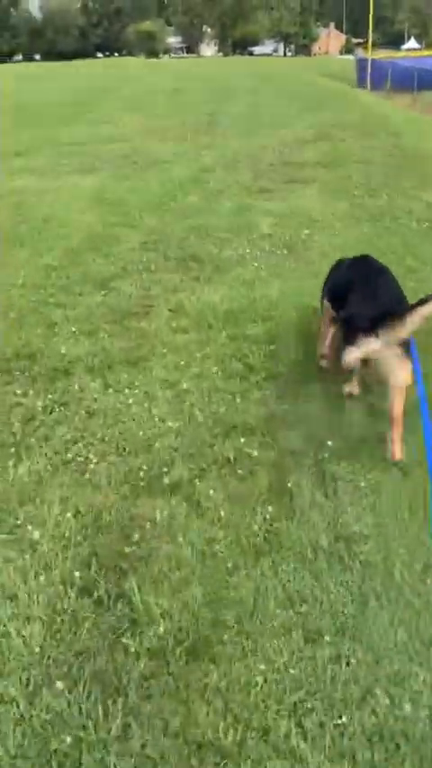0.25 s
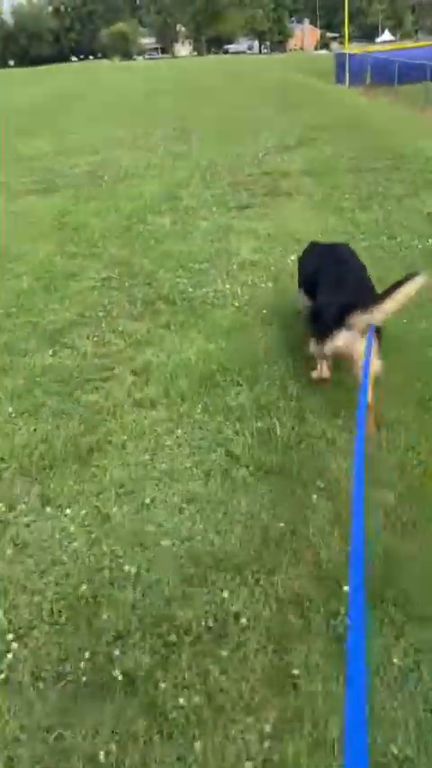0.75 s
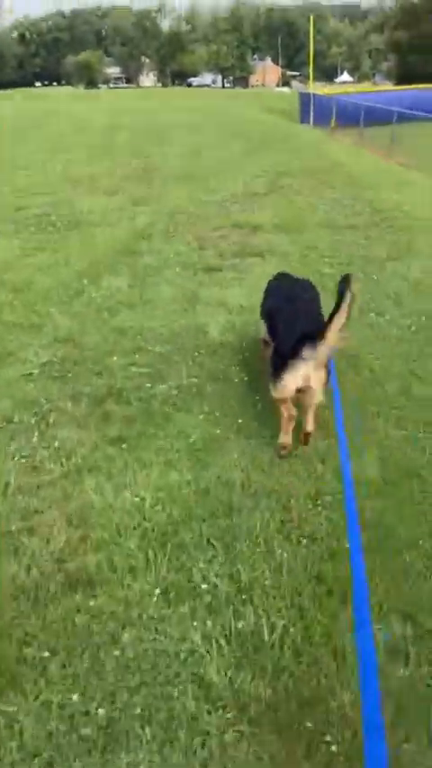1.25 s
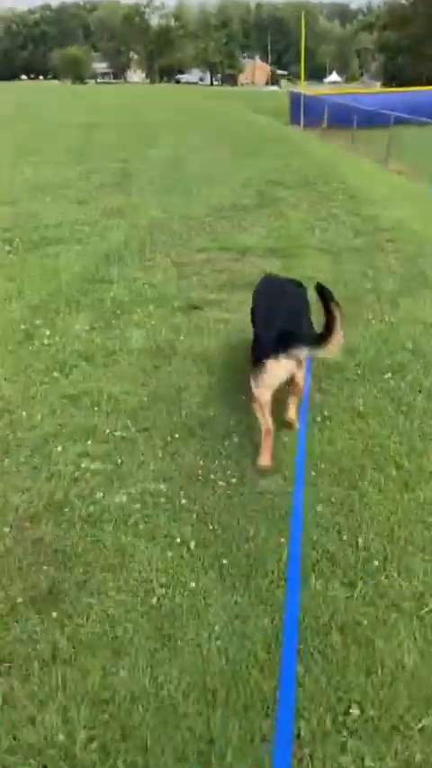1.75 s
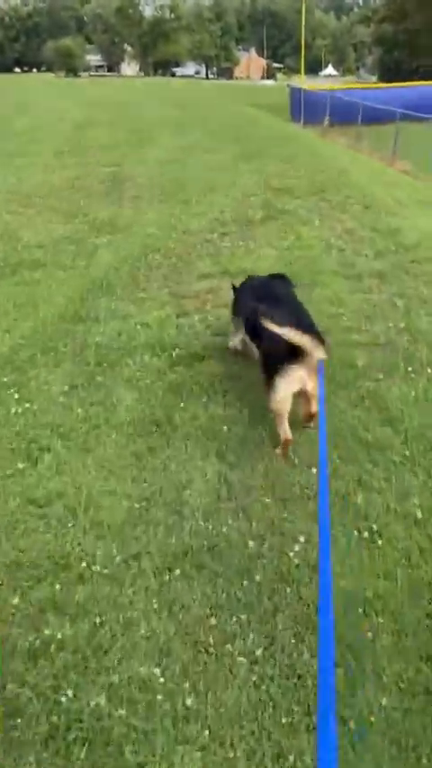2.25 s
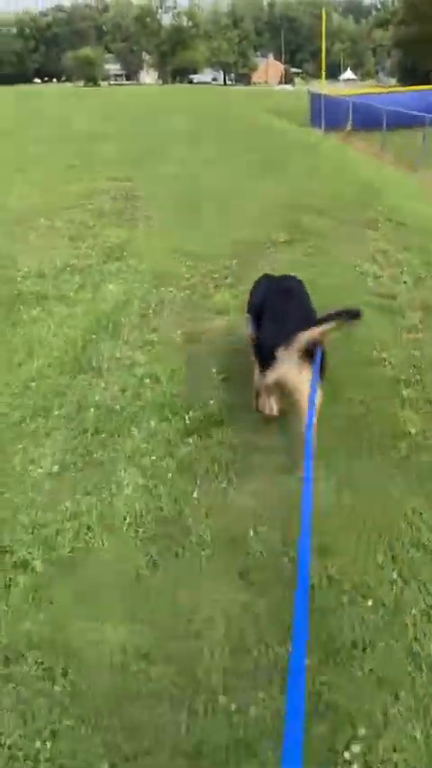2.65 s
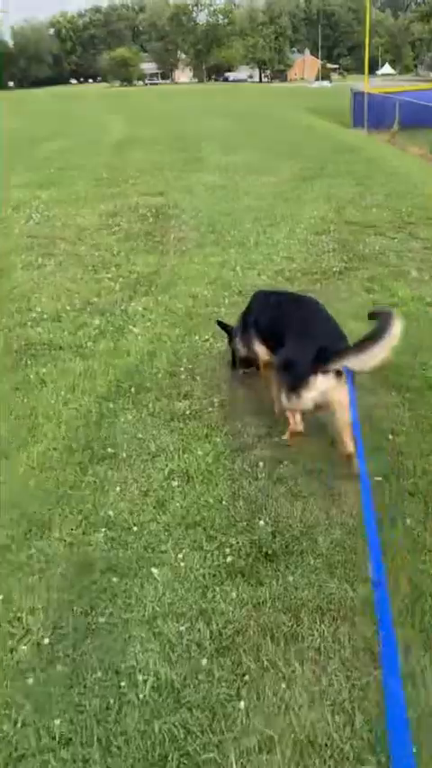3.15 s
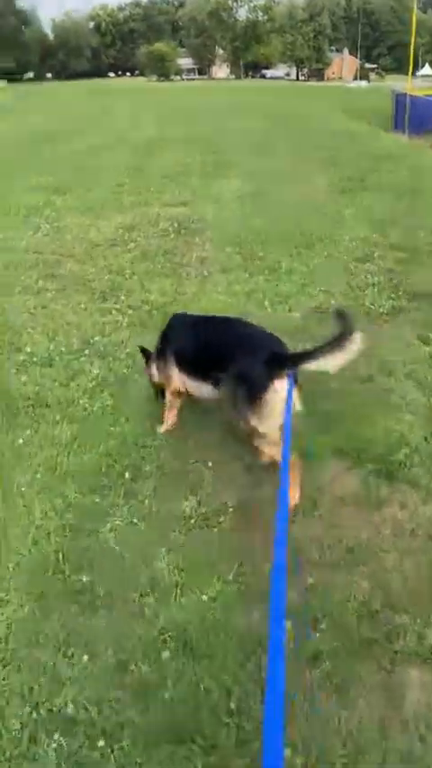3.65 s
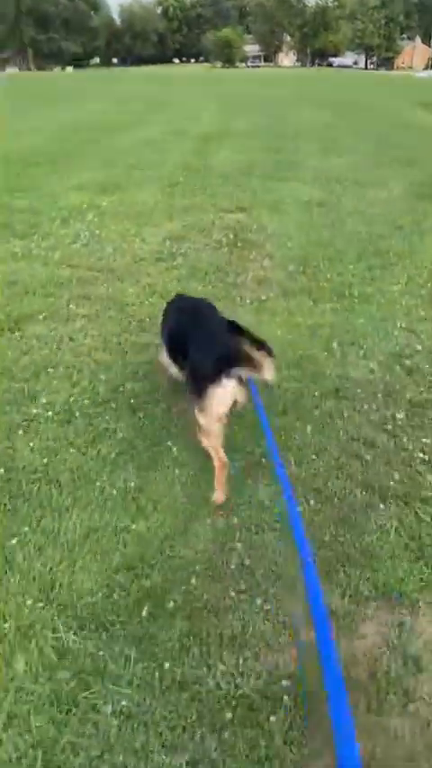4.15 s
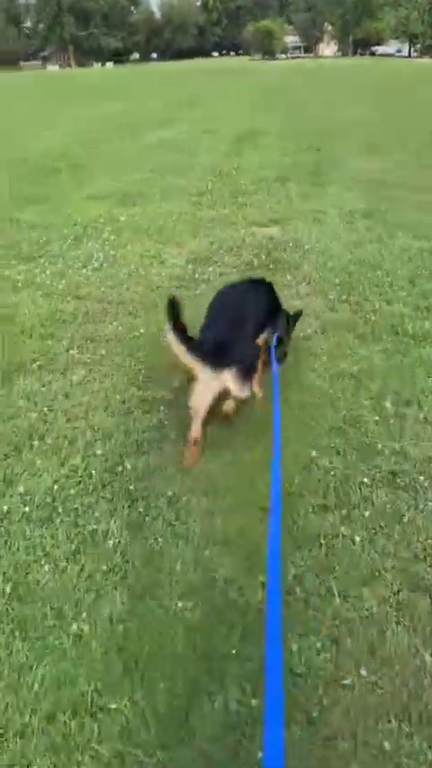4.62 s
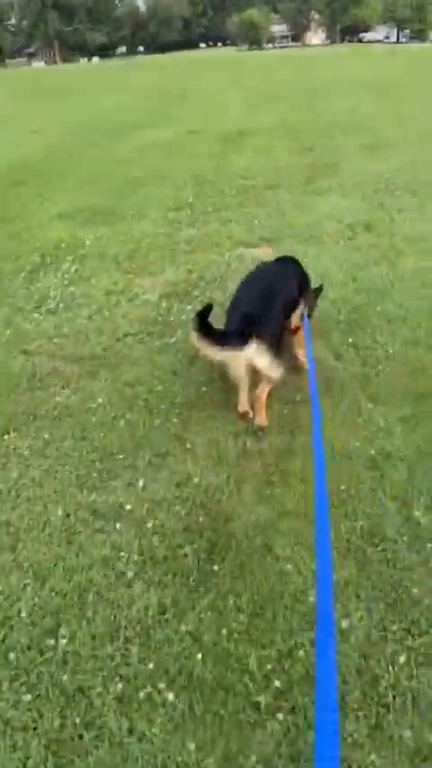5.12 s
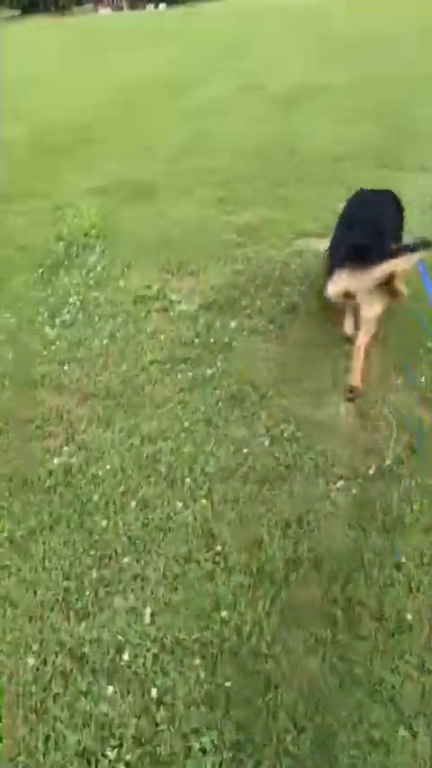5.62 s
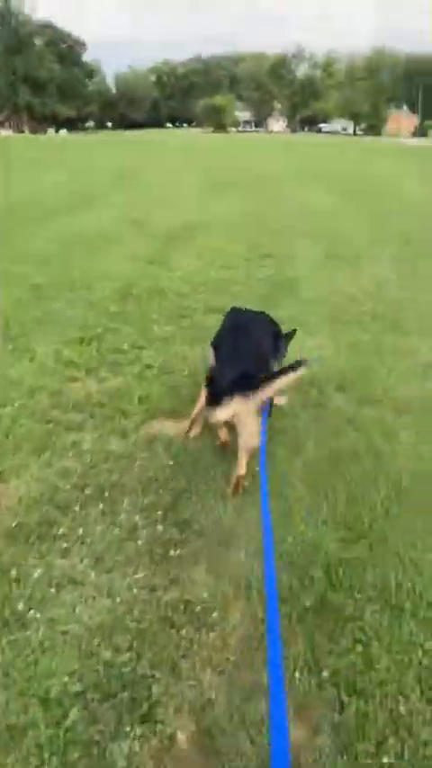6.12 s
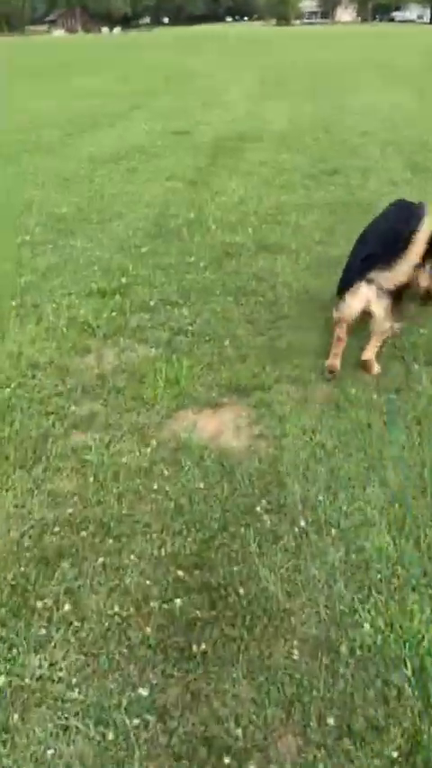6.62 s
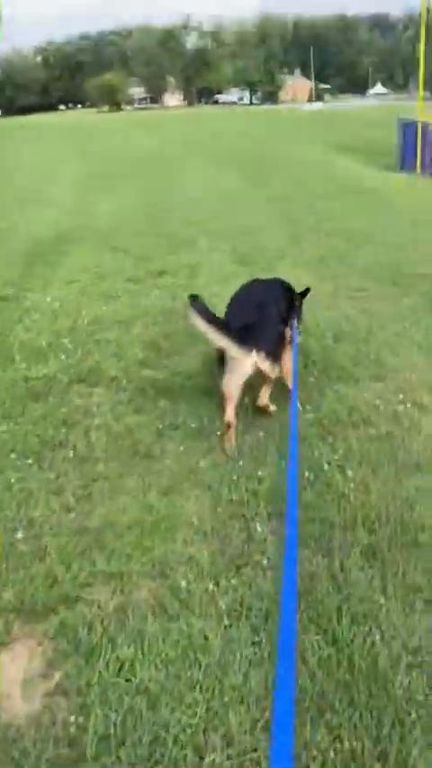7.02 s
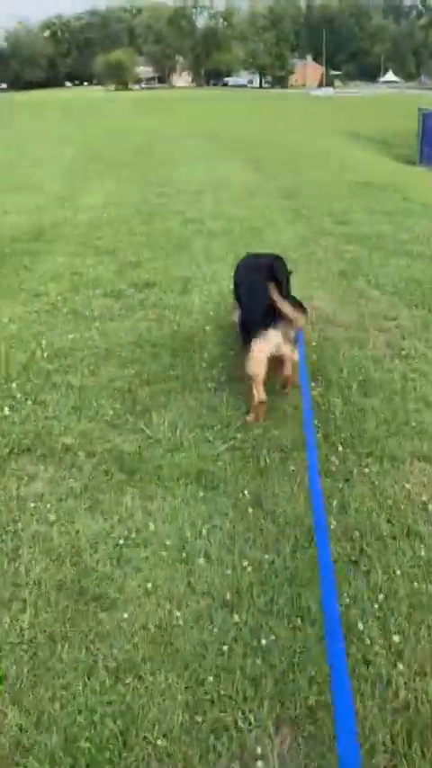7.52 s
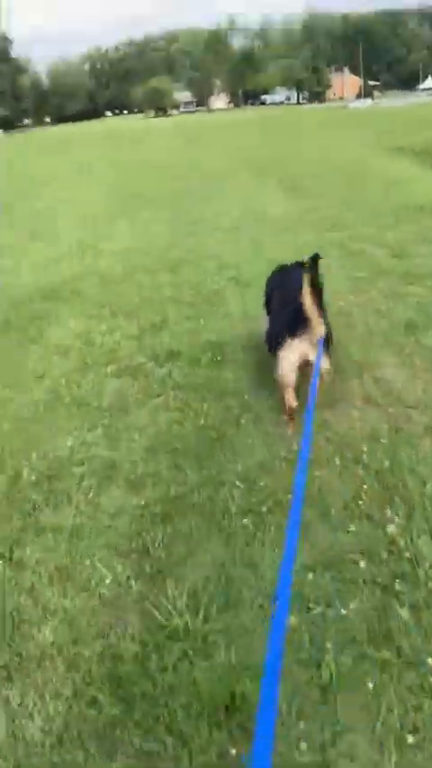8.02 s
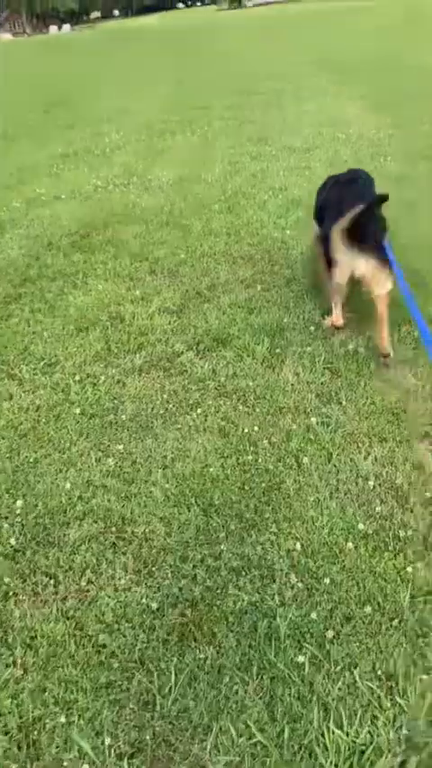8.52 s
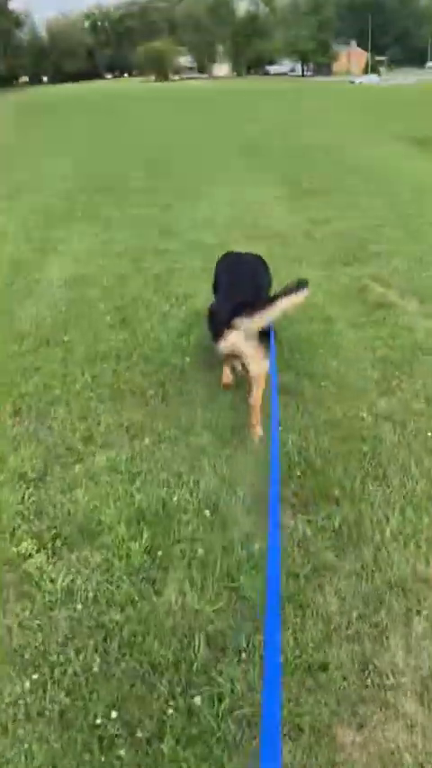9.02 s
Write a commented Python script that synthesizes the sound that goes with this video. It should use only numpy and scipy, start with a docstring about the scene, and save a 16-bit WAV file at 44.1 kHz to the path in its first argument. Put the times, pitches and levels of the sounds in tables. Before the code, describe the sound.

In an open grassy field, small metal leash clips jingle close to a handheld phone in stereo. A dense flurry of dry, bright clinks starts at once, with dull hand thuds and a wind puff around 0.1 s. Irregular knocks, short rattles and scraping slides continue, with tight clusters near 1.5, 1.9, 2.3 and 3.5 s; each ring dies almost instantly. Softer bumps come around 1.4-1.5 s. Low wind flutters beneath a faint hush. Around 4.5 s there is a tiny squeak, then thin insect buzzing at 4.7-5.0 s and very high small-ring pings near 5.5 s. Stronger clinks and a thud arrive at 6.1-6.3 s, another faint buzz at 6.5 s, and light grass brushes near 7.1 s. Crisp clatter returns around 7.0-7.2 s. The loudest clink hits at 8.7 s, followed by busy rattling, high pings and small bumps until about 9.3 s.

```python
"""A quiet mown field, where a dog is walked on a leash held in the same hand as the phone.
Tugs of the leash make its metal clips knock and rattle as damped modes; sliding contacts chatter and scrape.
A small ring tinkles among them in short, very high pings, and thin squeaks whistle now and then.
Filtered noise makes the air on the microphone ports, feet in grass, insect buzzes and the hush;
low decaying modes with a noise scuff make the hand bump the phone."""
import sys
import numpy as np
from scipy import signal
from scipy.fft import rfft, irfft, next_fast_len
from scipy.io import wavfile
from scipy.ndimage import uniform_filter1d

SR = 44100
rng = np.random.default_rng(int(sys.argv[2]) if len(sys.argv) > 2 else 0)


def transcribe(u):
    """Save the signal u as a 16-bit wav file named by the first command-line argument.

    u: samples, shape (n,) or (channels, n), limited to [-1, 1]; the rate is SR.
    q: integer samples, one column per channel.
    """
    v = np.clip(np.atleast_2d(u).T, -1, 1)
    q = np.round(v * 32767).astype(np.int16)
    wavfile.write(sys.argv[1], SR, q)


N = 408807
RING_SAMPLES = 4096  # length of one short sound
BLOW_SAMPLES = 200  # opening stretch over which a blow's level is set
TIME = np.arange(N) / SR
AGE = TIME[:RING_SAMPLES]

# Table values are starting points: the functions trim levels and scatter pitches, levels and decays.
# Colour curves give only the shape of a spectrum.

# Knocks of clip against clip: (time [s], ring level [dB], ring pitch [Hz], dry knock over ring [dB],
# upper modes over ring [dB], left minus right [dB])
CLINKS = [(.017, -40, 4060, -14, -10, -10), (0.054, -32, 3510, -16, -9, -7),
          (.068, -34, 3700, -13, -3, -3.5), (0.1042, -31, 4300, -4, -16, -5),
          (.119, -31.5, 4320, -8, -5, -1.5), (.127, -32, 4540, -13, -4, -2), (.136, -29, 4690, -23, 0, -1),
          (.147, -34, 4070, -18, -2, -1.5), (0.1975, -32.5, 4180, -11.5, -1, -9),
          (.258, -44.5, 3980, -15, -8, -13), (.3657, -32, 4080, -16, 0, -2), (.58, -37, 3990, -16, -6, 1),
          (0.5903, -30.5, 3860, -7, 3, 0), (.6315, -37, 4240, -10, 13, 0.5),
          (.677, -33.5, 4220, -11, 12, 1), (0.6982, -31, 3850, -12, 8, -1), (.754, -39, 4020, -7, -9, -9),
          (0.7946, -30, 4100, -8, -6, -6), (.8397, -37, 3940, -12, 1, -5),
          (.973, -47.5, 4050, -3, -10, -10), (1.0164, -27, 3930, -7, -13, -3.5),
          (1.03, -42, 3900, -14, -10, -3), (1.042, -38, 3980, -11, -9, -4), (1.098, -43, 3930, -10, -7, -4),
          (1.106, -48, 4010, -17, -4, -7), (1.1723, -32, 4070, -7, -5, -1),
          (1.341, -40.5, 4110, -21, -7, -0.5), (1.396, -46, 3980, -13, -10, 0),
          (1.438, -44, 4020, -1.5, 6, 0.5), (1.4748, -28, 3990, -20, -2, 15),
          (1.496, -35, 4000, -12, -5, -1), (1.5015, -28.5, 3960, -16, -13, 1),
          (1.5055, -26.5, 3880, -12, 3.5, 0), (1.537, -37.5, 3800, -0.5, -15, 12),
          (1.573, -37, 3900, -10, -12, -1), (1.595, -41, 4030, -15, -8, 0), (1.6585, -41, 3830, -3, 8, -1),
          (1.697, -32, 3900, -12, 10, -1), (1.786, -42, 3820, -7, 16, -2), (1.883, -34, 3800, -2, 6, -2),
          (1.906, -28.5, 3460, -8, -2, -1.5), (1.9193, -30.5, 3420, -13, 12.5, 0),
          (1.93, -31, 3900, -7, -7, -3), (1.967, -43, 4100, -4, -1, 5), (2.064, -36.5, 3980, -18, -8, -3.5),
          (2.114, -39, 4090, -18, -3, -6), (2.1336, -33.5, 4210, -14, 12, -1),
          (2.239, -41, 4160, -10, -5, 0), (2.247, -37.5, 3980, -16, -14, 2), (2.277, -29, 3880, -9, -10, 6),
          (2.2817, -22, 3910, -6, -27, 0.5), (2.292, -23, 4100, -13, -21, 14),
          (2.2965, -25, 3960, -12, -10, 1), (2.3049, -26, 3870, -11, -22, 0.5),
          (2.315, -37, 4050, -6, -6, 2), (2.354, -19, 3920, -17, -24, 1), (2.402, -40, 3860, -22, 4, 0),
          (2.425, -48, 3920, -15, 16, 0), (2.512, -40, 3930, -14, 14, 0),
          (2.5281, -25.5, 3900, -15, 6.5, -0.5), (2.575, -38.5, 3980, -4, 11, 0),
          (2.593, -37, 3980, -17, 5, -2), (2.7054, -37, 4090, -22, -6, -13),
          (2.72, -41, 4000, -20, -10, -10), (2.932, -31.5, 4080, -6.5, -20, 5),
          (2.963, -33.5, 4210, -18, -9, 0), (2.991, -44, 4100, -16, -5, -5),
          (3.003, -40, 4060, -18, -8, -12), (3.053, -40, 3970, -17, 0, -1),
          (3.173, -44, 4080, -19, -12, -12), (3.193, -33, 3960, -27, 0, -1),
          (3.224, -45, 4060, -18, -4, -9), (3.244, -45, 4040, -18, -9, -8),
          (3.3572, -35.5, 3870, -20, -15, 0.5), (3.393, -41, 4050, -11, 0, 2),
          (3.413, -30.5, 3940, -16, -8, 1.5), (3.432, -38, 3970, -7, -8, 0.5),
          (3.4656, -32, 4090, -10, 1, 0), (3.473, -31, 3990, -25, -13, -2),
          (3.49, -27.5, 4010, 0.5, 2, -0.5), (3.497, -25, 3920, -6, 8.5, 1),
          (3.7049, -39.5, 4120, -5.5, -16, -4.5), (3.78, -30, 4140, -15, 8.5, 3.5),
          (3.802, -36.5, 4150, -11, 13, -4), (3.8247, -29.5, 3950, -10.5, 1, -2.5),
          (3.831, -34.5, 4000, -8, 14.5, 8), (3.842, -32, 3950, -20, -8, -3.5),
          (3.887, -39, 3940, -16, -9, -6), (3.92, -41, 3930, -9, -12, -6), (4.055, -40, 4100, -14, 8, -12),
          (4.2227, -35.5, 3970, -0.5, -18, 0), (4.246, -29, 4000, -7, 6, 1),
          (4.308, -40, 3940, -20, -1, -0.5), (4.406, -41, 4130, -13, -2, 0), (4.419, -38, 4100, -17, 8, 0),
          (4.44, -36, 3910, -13, -1, -1), (4.5006, -29, 3990, -38, -1, -9),
          (4.7705, -37, 3800, -14, -3, -2), (4.783, -46, 4040, -18, -9, 4), (4.821, -40, 3950, -18, -8, 8),
          (4.9015, -40, 3970, -11, -5, -8), (4.954, -41, 3900, -12, 7, -14),
          (5.192, -35.5, 3890, -3.5, -11, -2), (5.2002, -34.5, 3920, -7, -22, -3),
          (5.21, -39, 3920, -10, -6, 0), (5.217, -40, 3960, -10, -1, 0), (5.2646, -34, 3930, -5, -5, 1),
          (5.29, -34.5, 4080, -4.5, 4, 0), (5.333, -40, 3840, 1, 2, -4), (5.3528, -34.5, 3970, -3, 8, -1),
          (5.36, -38, 3980, -15, 0, -8), (5.374, -37, 3970, -17, -9, -8),
          (5.4022, -38.5, 3800, -0.5, -5, -6), (5.494, -42, 3980, -17, -7, -6),
          (5.571, -46, 3940, -15, -7, -4), (5.587, -41, 3970, -16, -9, -2.5),
          (5.599, -46, 3980, -13, -2, 4), (5.631, -40, 3840, -10, 15.5, 9),
          (5.686, -37.5, 3850, -27, -24, 13), (5.758, -42, 3880, -18, -6, 1.5),
          (5.774, -42, 3970, -5, 0, 3), (5.8306, -38, 4130, -7, 7, -6), (5.843, -41, 4010, -16, -9, -7),
          (5.871, -36.5, 4040, -6, -13, -12), (5.892, -29.5, 4040, -4.5, -19, -9),
          (5.905, -36, 3880, -18, -13, -6), (5.933, -27, 4030, -16.5, -5, -16),
          (5.957, -44, 3960, -16, -13, -12), (6.011, -34, 4050, -15, 5, -0.5),
          (6.052, -40, 4100, -12, 3, -1), (6.0845, -24, 4150, -14, 2, 11), (6.09, -21, 3870, -32, 2, -1),
          (6.146, -34, 3930, -30, 5, 0.5), (6.2592, -26.5, 3910, -19, -19, 1),
          (6.2713, -33.5, 3880, -5, 9, 15), (6.284, -30, 3950, -14, 11, -0.5),
          (6.3134, -29.5, 4250, -9.5, 7, -13), (6.378, -38, 3950, -14, -18, -5),
          (6.509, -35, 3860, -14, -1, -3.5), (6.525, -35, 3510, -22, -17, -1),
          (6.5593, -32, 3370, -30, -19, -1), (6.5864, -34.5, 3680, -9, -16, -1.5),
          (6.617, -37, 4030, -13, -8, 3), (6.682, -36.5, 3760, -5, 4, -2.5),
          (6.708, -39.5, 3870, 1, -9, -9), (6.724, -40, 4000, 0, -2, -7), (6.75, -37, 3970, -14, -3, -15),
          (6.772, -33, 4120, -17, 8, -9), (6.79, -33, 4080, -16, -7, -6), (6.994, -32, 3980, -17, -3, -1),
          (7.016, -32, 3880, -15, -13, 2), (7.0232, -21, 3930, -28, 3.5, -1),
          (7.042, -35, 3920, -15, -8, -0.5), (7.104, -41, 3430, -9, -10, 1),
          (7.1968, -27, 3960, -0.5, -7, 2), (7.2052, -28, 3620, -20, -6, -0.5),
          (7.213, -25.5, 3680, -15, -6, -1.5), (7.2233, -29.5, 4030, 0, -7, -1.5),
          (7.286, -41, 4000, -17, -12, -10), (7.295, -38, 4030, -3.5, -4, -0.5),
          (7.463, -39, 4010, -13, -7, -1.5), (7.476, -42, 3970, -14, -6, -2.5),
          (7.494, -38, 3920, -9, -8, -3), (7.5444, -30, 3940, -26, -2, -3.5),
          (7.563, -43, 3930, -18, -9, -3), (7.595, -41.5, 3950, -6, 10, -4),
          (7.697, -33.5, 4070, -20, -4, -7), (7.798, -31.5, 3630, -10.5, 2.5, -1.5),
          (7.8693, -41, 3960, -16, -7, 6), (7.904, -35, 3940, -22, -4, 0),
          (7.9148, -27.5, 4000, -6, 6.5, 12), (7.976, -45.5, 3950, 1, 19, 4),
          (8.0558, -28, 3660, -22, 5.5, -7), (8.0847, -32.5, 3970, -11, 8, -10),
          (8.1735, -41, 4020, -7, 2, 4), (8.198, -45, 3940, -14, -12, -6), (8.247, -42, 3980, -15, -9, 3.5),
          (8.2804, -42, 3950, 1.5, 6, -6), (8.3204, -39.5, 3400, -2, 8, 3), (8.363, -46, 4050, -15, -1, -4),
          (8.386, -40.5, 3550, -7, -4, -3.5), (8.4465, -29, 3690, -10.5, -27, 2.5),
          (8.565, -26.5, 3970, -24, 0, -8), (8.599, -42, 4000, -14, -8, -16),
          (8.6968, -25, 4000, -15, 3.5, -0.5), (8.7258, -14.3, 3960, -20.5, -1.5, -1.5),
          (8.7318, -22.5, 4260, -23, -9, 2.5), (8.7471, -20, 3930, -18.5, 1, -2),
          (8.7562, -27, 3920, -19, 6.5, 0), (8.795, -36, 3930, -13.5, -5, -4.5),
          (8.869, -40, 3960, -8, -1, -10), (8.925, -28.5, 4100, -9, -12, -13),
          (8.93, -24, 3910, -15, 7, -11), (8.9441, -27, 4150, -15, 2, -23),
          (9.0168, -29.5, 3670, -12, 6.5, -2), (9.069, -44, 3930, -13, -14, -4),
          (9.114, -43.5, 3940, -14, -6, -4), (9.172, -43, 3960, -17, -14, -4),
          (9.181, -42, 3960, -19, -7, -4), (9.214, -24.5, 3800, -15, 7, -6),
          (9.226, -28.5, 3840, -11, 1, -4), (9.246, -36, 3960, -8, 12, -12),
          (9.256, -30, 3940, -12, -4, -3.5)]
# Main ring of the clips: (multiple of ring pitch [ratio], level [dB], t60 [s])
MAIN_MODES = [(.88, -8, 0.023), (0.952, -11, 0.028), (0.997, 0, 0.047), (1.007, -3, 0.037),
              (1.055, -9, 0.022), (1.16, -9, 0.0099)]
# Upper modes of the clips: (pitch [Hz], level [dB], t60 [s])
UPPER_MODES = [(5390, 0, 0.018), (6008, 9.5, 0.021), (6600, -2.5, 0.045), (7340, 1, 0.027),
               (7620, 5.5, 0.025), (8730, -11, .012), (9450, -2.5, 0.015), (9900, -17, .012),
               (10500, -14, 0.032), (10700, -10, .019), (11900, -14, .008), (13500, -3, .018),
               (14200, -9, .012), (15410, -20, .025)]
# Colour of the dry knock: (frequency [Hz], level [dB])
KNOCK_COLOUR = [(700, -74), (1400, -7.5), (2200, 1.5), (3200, 7), (4600, 1), (6500, -6.5), (8200, -2),
                (10000, -10), (15000, -25)]
# Loose rattles: (start [s], end [s], start pitch [Hz], end pitch [Hz], level of each knock [dB])
RATTLES = [(0.584, 0.716, 3830, 3900, -51), (1.479, 1.59, 3900, 4100, -43.5),
           (1.897, 1.953, 3560, 3390, -34.5), (4.773, 4.831, 3430, 3710, -47),
           (5.27, 5.369, 3940, 3780, -42), (6.512, 6.627, 3410, 3540, -45), (6.68, 6.779, 3300, 2910, -48),
           (8.728, 8.801, 3920, 3950, -41), (8.9, 9.042, 4040, 3680, -45)]
# Tugs that slide the clips over each other: (start [s], length [s], chatter of the main ring [dB],
# dry scrape [dB], fine jingle [dB])
TUGS = [(0.07, 0.12, -41, -54, -55.5), (0.58, .11, -44.5, -51, -54.5), (1.013, 0.059, -53, -54, -57.5),
        (1.17, 0.078, -52, -68, -53.5), (1.474, 0.079, -37.5, -47.5, -55.5),
        (1.648, 0.058, -57, -50, -52.5), (1.895, 0.059, -41, -48, -48), (2.093, 0.044, -51, -53, -51.5),
        (2.289, 0.042, -35.5, -47, -62), (2.376, 0.052, -47, -74, -55), (2.529, 0.047, -37, -39.5, -46.5),
        (2.689, 0.027, -48, -49, -55.5), (2.893, 0.062, -41.5, -65, -52.5), (3.034, 0.073, -45.5, -56, -72),
        (3.406, 0.051, -42, -46, -60), (3.461, 0.085, -43, -50, -51.5), (3.818, 0.11, -46.5, -54.5, -59.5),
        (3.96, 0.11, -52, -73, -56.5), (4.238, 0.049, -40, -46.5, -48), (4.303, 0.092, -53, -72, -53),
        (4.415, 0.035, -40.5, -43.5, -46.5), (4.775, 0.04, -60, -71, -57), (4.906, 0.098, -50, -71, -57),
        (5.061, 0.014, -49, -55, -51), (5.182, 0.027, -43, -55, -55), (5.27, 0.086, -40.5, -50, -56),
        (5.402, 0.2, -59, -72, -54), (5.613, 0.22, -50, -60, -56.5), (6.049, 0.065, -39, -47, -48.5),
        (6.15, 0.029, -37, -66, -54), (6.235, 0.1, -37, -44.5, -49), (6.383, 0.12, -53, -49.5, -65),
        (6.508, 0.16, -46.5, -55, -56.5), (6.674, 0.14, -56, -59, -52), (6.972, 0.033, -36, -45.5, -46),
        (7.202, 0.024, -35, -35, -36.5), (7.372, 0.15, -66, -50.5, -78), (7.477, 0.14, -46, -57, -58),
        (7.868, 0.053, -37, -45, -58), (7.978, 0.042, -57, -49, -52), (8.044, 0.098, -52, -54.5, -57.5),
        (8.263, 0.091, -47.5, -54, -52), (8.552, 0.041, -62, -52.5, -54), (8.69, 0.098, -41.5, -54, -51.5),
        (8.85, 0.026, -52, -54, -53), (8.89, 0.11, -42, -46.5, -44.5), (9.17, .04, -70, -56, -53.5),
        (9.222, 0.048, -47, -61, -50)]
# The clips never quite rest: (chatter [dB], scrape [dB], jingle [dB])
SWAY_DB = (-64, -58, -65.5)
# Colour of the dry scrape: (frequency [Hz], level [dB])
SCRAPE_COLOUR = [(400, -36), (900, -3), (1500, 0.5), (2300, 10.5), (3200, 6.5), (4500, 5), (6500, -4.5),
                 (8200, -4), (12000, -10), (15000, -17)]
# Colour of the fine sizzle in the jingle: (frequency [Hz], level [dB])
SIZZLE_COLOUR = [(4000, -13), (6000, 0.5), (7300, 10.5), (8200, 7), (9200, 7), (10500, 6.5), (11500, 3),
                 (12300, -10), (13600, 17.5), (14800, -34), (15400, -2), (16200, -38)]
# Modes of the small ring as it shivers along: (pitch [Hz], level [dB], t60 [s])
SMALL_RING_MODES = [(8700, -12, 0.083), (9800, -6.5, 0.035), (10210, 4.5, 0.083), (10670, -4, 0.054),
                    (15410, -2.5, 0.13)]
# Pings of the small ring: (time [s], level [dB], pitch [Hz], t60 [s], rub [s], tick over ping [dB])
TINKLES = [(1.238, -34, 13900, .03, .0025, -15), (1.654, -41.5, 10600, .02, .008, -8),
           (2.13, -38, 10320, .04, .0025, -15), (5.046, -40, 10830, .03, 0.0028, 0),
           (5.408, -38, 13400, .02, .003, -4), (5.443, -39, 13500, .04, .003, -15),
           (5.505, -37, 15300, .03, .014, -15), (5.507, -47, 10000, .04, .014, -15),
           (5.534, -38, 10170, 0.036, .008, -12), (5.536, -36, 15410, .048, .01, -15),
           (5.678, -36, 13850, .05, .009, -22), (5.895, -26, 14700, .009, 0.0016, -13),
           (6.104, -39.5, 10400, 0.049, .0025, -12), (6.343, -37, 8750, 0.027, .0025, -10),
           (6.488, -38, 10200, 0.054, .0025, -15), (6.499, -39, 13520, .04, .0025, -15),
           (6.806, -27, 14700, .007, .001, -2.5), (6.882, -40, 13200, .012, .002, -3),
           (7.976, -35, 10300, 0.058, .0025, -14), (8.952, -31, 10350, 0.04, .0025, -10),
           (8.982, -34, 10400, .035, .0025, -10)]
# Colour of the small ring's tick: (frequency [Hz], level [dB])
TICK_COLOUR = [(3000, -30), (6000, -12), (9000, 2), (12000, -7), (15000, 3.5)]
# The ports hear the nearby metal in and out of step by turns: (frequency [Hz], left ahead of right [rad])
PORT_PHASE = [(0, 0), (2400, 0), (3500, -.6), (4300, .3), (4900, 1.4), (5600, 1.4), (6200, 1.1),
              (7200, 2.5), (8100, 3.2), (9000, 4.9), (10000, 6.2), (11600, 6.3), (12500, 9.3), (14500, 9.6),
              (15500, 12)]
# Thin squeaks: (time [s], length [s], pitch [Hz], level [dB])
SQUEAKS = [(4.475, 0.022, 2280, -53), (6.797, 0.044, 6540, -54), (7.462, 0.044, 5170, -56)]
# Bumps of the hand on the phone: (time [s], level [dB], pitch [Hz], t60 [s])
BUMPS = [(0.023, -27.5, 203, 0.04), (0.121, -14.5, 436, 0.013), (0.131, -15, 90, 0.061),
         (0.17, -32, 79.6, 0.078), (1.305, -33.5, 85, .08), (1.396, -24.5, 96, 0.041),
         (1.503, -23.5, 115, 0.07), (4.399, -34.5, 258, 0.04), (5.826, -41, 320, 0.07),
         (6.26, -15.5, 343, 0.019), (6.268, -20, 80, 0.054), (6.35, -25, 200, 0.014),
         (6.448, -32.5, 126, 0.11), (7.135, -34.5, 130, 0.038), (6.966, -26, 182, 0.024),
         (7.702, -32, 900, 0.017), (8.944, -28, 876, 0.026), (8.967, -22.5, 121, 0.047),
         (9.194, -32, 420, .012), (9.195, -32, 776, 0.048)]
# Colour of the scuff in a bump: (frequency [Hz], level [dB])
SCUFF_COLOUR = [(30, -73), (70, 17), (130, 0.5), (250, 4), (450, -13.5), (800, -19), (1600, -48)]
# Gusts on the ports: (peak time [s], half width [s], level [dB])
GUSTS = [(.015, 0.02, -35), (.138, 0.026, -28.5), (.39, 0.016, -44), (1.12, 0.061, -37.5),
         (1.34, 0.033, -33.5), (1.44, 0.031, -30), (1.52, 0.062, -34), (2.04, 0.02, -39),
         (3.56, 0.078, -39.5), (3.87, 0.039, -42.5), (4.2, 0.091, -39), (4.92, 0.052, -39.5),
         (6.13, 0.15, -38.5), (6.265, 0.04, -26.5), (6.37, 0.024, -34.5), (6.455, 0.01, -35),
         (7.13, 0.0091, -37), (7.42, 0.06, -39), (7.64, 0.051, -34), (7.95, 0.11, -34),
         (8.16, 0.052, -35.5), (8.37, 0.036, -44), (8.76, 0.089, -37), (9.02, 0.085, -33.5),
         (9.22, 0.027, -32)]
# Steady flow of air between gusts: (time [s], level [dB])
BREEZE = [(0, -54.5), (.8, -48), (1.4, -48.5), (1.85, -49), (2.7, -45), (3.2, -41.5), (3.8, -44.5),
          (4.6, -44), (5.45, -45), (5.7, -54), (6.1, -43), (6.65, -51), (7, -47), (8.3, -40.5), (9.27, -44)]
# Flutter between gusts: (time [s], level [dB])
FLUTTER_LEVEL = [(0, -55.5), (.22, -68), (.58, -63.5), (.8, -53), (1.05, -53.5), (1.22, -68.5), (1.45, -54),
                 (1.8, -54.5), (3.3, -55.5), (4.3, -52), (5.15, -57), (5.5, -51), (5.7, -64), (6.1, -48.5),
                 (6.5, -56.5), (6.95, -54), (7.1, -77), (7.26, -52.5), (7.5, -64), (7.76, -64),
                 (7.9, -59.5), (8.5, -52), (9.27, -53.5)]
# The air turns about the phone: (time [s], opposed over shared part of the buffeting [dB])
WIND_SIDE = [(0, -8), (.4, 7.5), (1.3, -3), (2.5, -2), (4.3, -3), (4.6, -9), (5.3, -1), (5.7, 6),
             (6.2, -1.5), (7.1, 8.5), (7.9, -5), (8.3, -22), (9.27, -38)]
# Colour of the large eddies: (frequency [Hz], level [dB])
BUFFET_COLOUR = [(20, -32), (35, -16), (50, -1), (68, -1.5), (100, -3), (150, -9.5), (220, -16),
                 (400, -34.5), (900, -56)]
# Colour of the small eddies: (frequency [Hz], level [dB])
FLUTTER_COLOUR = [(100, -13), (220, -6.5), (330, -1.5), (500, -5), (850, -8), (1200, -23.5), (2500, -40)]
# Puffs of air round the phone: (peak time [s], half width [s], level [dB])
SWIRLS = [(.125, 0.044, -49), (.42, 0.14, -49.5), (.66, 0.062, -47), (1.0, 0.041, -46), (1.15, 0.12, -48.5),
          (1.4, 0.081, -50), (1.55, 0.056, -47), (1.92, 0.027, -47.5), (2.55, 0.017, -37), (2.76, .02, -54),
          (2.96, .04, -55), (3.45, 0.055, -43), (3.85, .03, -58), (3.98, .04, -55), (4.33, 0.092, -59),
          (5.0, .025, -46), (5.4, 0.025, -42), (5.72, 0.081, -49), (5.84, 0.038, -40), (6.1, 0.076, -52),
          (6.26, 0.032, -53), (6.48, 0.13, -46.5), (7.12, 0.11, -48.5), (7.45, 0.044, -40),
          (7.7, 0.12, -45.5), (8.0, 0.056, -44.5), (8.46, 0.035, -51), (8.88, 0.074, -45),
          (9.18, 0.024, -41)]
# Colour of the puffs: (frequency [Hz], level [dB])
SWIRL_COLOUR = [(100, -16), (220, -4.5), (330, -0.5), (500, -3.5), (850, -3.5), (1300, -19.5), (2500, -37)]
# Steps through the grass: (peak time [s], half width [s], level [dB], centre [Hz])
SWISHES = [(.5, 0.027, -54, 800), (4.84, 0.024, -57, 1400), (4.99, 0.024, -56, 880), (6.43, .08, -54, 2340),
           (6.72, 0.036, -54, 2800), (7.1, .04, -50.5, 1480), (7.46, 0.048, -54.5, 1600),
           (8.06, 0.03, -53, 790)]
# Colour of the field's hush: (frequency [Hz], level [dB])
FIELD_COLOUR = [(100, -3), (200, -14), (400, -6), (900, 5.5), (1300, 3.5), (2500, 4.5), (4000, -0.5),
                (6000, -6.5), (8000, -60), (11000, -6), (13000, -23), (16000, -45)]
# Insect buzzes: (start [s], end [s], level [dB])
BUZZES = [(4.735, 4.88, -53.5), (4.89, 5.017, -45.5), (6.466, 6.604, -49.5)]

# A clip that hangs further to one side rings further out of step at the two ports
STEP_RAD_PER_DB, STEP_AHEAD_RAD, STEP_SCATTER_RAD, STEP_MOST_RAD = 0.71, -0.43, 0.45, 2.28
RING_DETUNE, RING_MIX_DB = .012, 3.5  # scatter of the main modes: share of pitch, level
UPPER_DAMPING = .85  # factor on the upper modes' t60
SEAT_S = .0008
# A struck clip rebounds: mean gap, first rebound over blow, change at each further one
REBOUND_S, REBOUND_DB, REBOUND_LOSS_DB = .0035, -14, -5
# Light knocks in each tug: level over its chatter, scatter of level and pitch (share), left minus right and its
# scatter [dB]
LIGHT_DB, LIGHT_SCATTER_DB, LIGHT_PITCH_SCATTER = -1, 2.5, 0.0312
LIGHT_PAN_DB, LIGHT_PAN_SCATTER_DB = -2, 0.5
LIGHT_KNOCK_DB, LIGHT_UPPER_DB = -10, 4  # dry knock and upper modes over ring
RATTLE_PER_S = 90
TUG_ATTACK_S, TUG_RELEASE_S = 0.022, 0.028
SLACK_DB, SLACK_S = -4, 0.043  # a softer rub leads in while the slack is taken up
CATCH_S = .04  # a tug starts on a knock nearer than this
# Sliding contacts: density, inequality, dry ticks before pressure, grain of the friction noise
TOUCHES_PER_S, TOUCH_SPREAD_DB, TICK_DB, GRAIN_DB, GRAIN_PER_S = 290, 3.0, -4, 1.8, 300
SHIFT_DB, SHIFT_PER_S = 3.5, 16  # the load wanders between contact points
CHATTER_HZ, CHATTER_SPREAD, CHATTER_DAMP_S = 3964, 0.0704, .05  # centre pitch, share either way, extra decay
# The bands of the sizzle swell and fade on their own
FLICKER_EDGES_HZ, FLICKER_DB, FLICKER_PER_S = (3500, 6500, 8500, 10000, 11500, 14000, 17000), 2.8, 18
SHIVERS_PER_S, SHIVER_SPREAD_DB, SHIVER_PITCH_SCATTER = 70, 4.5, .014
FLUTTER_GROWTH = 0.062  # small eddies grow little: dB per dB of flow over the breeze
WIND_LEAN_DB = -1.5  # left minus right
HUSH_SWELL_DB, HUSH_SWELL_PER_S = 1.0, 4
TOP_HZ = 15900


def clinks():
    """Each knock gives a dry crack and rings the clips, which the hand damps quickly."""
    rings, highs = np.zeros((2, 2, N))
    bite = seating()
    for s, db, hz, knock_db, upper_db, pan_db in list(CLINKS) + light_knocks() + rattles():
        angle = STEP_AHEAD_RAD + STEP_RAD_PER_DB * pan_db + STEP_SCATTER_RAD * rng.standard_normal()
        angle = np.clip(angle, -STEP_MOST_RAD, STEP_MOST_RAD)
        force = contact(chatter=.02, seconds=.0007)
        grip = np.exp(-AGE * undb(db) / 0.00034)  # hard knocks press the parts together and die sooner
        crack_fade = np.exp(-AGE / 0.00042) + undb(-32.0) * np.exp(-AGE / 0.016)
        crack = stereo_noise(side_db=-8.5, count=RING_SAMPLES) * crack_fade
        pan = level(lean(pan_db), 0)
        main = through(force, main_ring(hz, angle)) * bite * grip
        main = level(main, db - .3, count=BLOW_SAMPLES)
        upper = through(force, upper_ring(scatter=0.0093)) * bite
        upper = level(upper, db + upper_db - 11.0, count=BLOW_SAMPLES)
        knock = level(colour(crack * bite, KNOCK_COLOUR), db + knock_db + 2.5, count=BLOW_SAMPLES)
        bounce = rebounds()
        add(rings, s, through(bounce, main * pan))
        add(highs, s, through(bounce, (upper + knock) * np.sqrt(pan)))  # highs lean half as far
    return rings + ports(highs)


def light_knocks(count=2):
    """A few random knocks in each tug; each rings near the pitch of the chatter."""
    rows = []
    for start, end, (chatter_db, _, _) in tugs():
        places = (np.arange(count) + rng.random(count)) / count
        for place in places:
            force, pitch, side = rng.standard_normal(3)
            s = start + (end - start) * place
            db = chatter_db + LIGHT_DB + LIGHT_SCATTER_DB * force
            hz = CHATTER_HZ * (1 + LIGHT_PITCH_SCATTER * pitch)
            pan_db = LIGHT_PAN_DB + LIGHT_PAN_SCATTER_DB * side
            rows.append((s, db, hz, LIGHT_KNOCK_DB, LIGHT_UPPER_DB, pan_db))
    return rows


def rattles():
    """Loose clips shake in a quick, uneven run of small knocks; their pitch slides as they swing."""
    rows = []
    for start, end, start_hz, end_hz, db in RATTLES:
        count = int((end - start) * RATTLE_PER_S) + 1
        places = (np.arange(count) + rng.random(count)) / count
        for place in places:
            force, pitch, side = rng.standard_normal(3)
            s = start + (end - start) * place
            hz = (start_hz + (end_hz - start_hz) * place) * (1 + LIGHT_PITCH_SCATTER * pitch)
            rows.append((s, db + 2 * force, hz, LIGHT_KNOCK_DB, LIGHT_UPPER_DB, LIGHT_PAN_DB + 2 * side))
    return rows


def main_ring(hz, angle):
    """The low cluster of modes; the point of contact changes their mix and spacing."""
    ring = 0
    for multiple, db, t60 in MAIN_MODES:
        detune, mix = rng.standard_normal(2)
        ring = ring + mode(hz * multiple * (1 + RING_DETUNE * detune), db + RING_MIX_DB * mix, t60, angle)
    return ring


def upper_ring(scatter):
    """The high modes; how the clips lean on each other shifts their pitch, strength and damping."""
    ring = 0
    for hz, db, t60 in UPPER_MODES:
        detune, mix, damping = rng.standard_normal(3)
        decay = t60 * UPPER_DAMPING * undb(2 * damping)
        ring = ring + mode(hz * (1 + scatter * detune), db + 4 * mix, decay)
    return ring


def seating():
    """The rounded parts take a moment to seat, so a ring swells in."""
    return 1 - np.exp(-(AGE / SEAT_S) ** 2)


def rebounds(count=3):
    """A blow, then a few quick, uneven rebounds that tend to weaken."""
    force = np.zeros(RING_SAMPLES)
    force[0] = 1
    at = np.cumsum(REBOUND_S * rng.uniform(.5, 1.5, count))
    db = REBOUND_DB + REBOUND_LOSS_DB * np.arange(count) + 2 * rng.standard_normal(count)
    force[(at * SR).astype(int)] = undb(db)
    return force


def rubbing(count=9):
    """Sliding metal is a stream of tiny contacts at several points; each ticks dryly and rings at its own pitch."""
    chatter_gain, scrape_gain, jingle_gain = tugging()
    chatter, jingle, ticks = 0, 0, 0
    for place in np.linspace(-1, 1, count):
        touches = contacts(rate=TOUCHES_PER_S / count, spread_db=TOUCH_SPREAD_DB)
        ticks = ticks + touches
        # the load passes from point to point
        touches = touches * undb(SHIFT_DB * np.clip(walk(SHIFT_PER_S), -2, 1))
        ring = main_ring(CHATTER_HZ * (1 + CHATTER_SPREAD * place), rng.normal(-0.43, 0.66))
        chatter = chatter + through(touches, ring * seating() * np.exp(-AGE / CHATTER_DAMP_S))
        jingle = jingle + through(touches, upper_ring(scatter=0.034) * seating())
    grain = undb(GRAIN_DB * walk(GRAIN_PER_S) + walk(45))
    press = 1 - undb(SWAY_DB[1]) / scrape_gain  # slack clips only whisper; loaded ones tick
    dry_ticks = level(through(ticks, contact(chatter=.5, seconds=.0005)), TICK_DB) * press
    friction = stereo_noise(side_db=-8.5) * grain + dry_ticks
    scrape = level(colour(friction, SCRAPE_COLOUR), -0.57) * scrape_gain
    fine_friction = stereo_noise(side_db=-20.0) * grain + dry_ticks
    sizzle = level(flicker(colour(fine_friction, SIZZLE_COLOUR)), 5.4)
    fine = sizzle + level(jingle, 0) + level(shivers(), -3.0)
    chatter_lean = undb(np.array([[-1.2], [1.0]]))
    return level(chatter, -5.0) * chatter_gain * chatter_lean + ports(scrape + fine * jingle_gain)


def tugging():
    """Chatter, scrape and jingle gains: each tug leads in, bites, holds and dies away over a steady sway."""
    t = TIME[::32]  # coarse control steps
    power = undb(SWAY_DB)[:, None] ** 2
    for start, end, db in tugs():
        slack = undb(SLACK_DB) * fade(start - t, SLACK_S)
        rise = np.maximum(fade(start - t, TUG_ATTACK_S), slack)
        power = power + (undb(db)[:, None] * rise * fade(t - end, TUG_RELEASE_S)) ** 2
    return [np.interp(TIME, t, np.sqrt(p)) for p in power]


def tugs():
    """A tug bites with a knock where one is near: (start [s], end [s], levels [dB])."""
    for s, length, *db in TUGS:
        knock_s = nearest_knock(s)[0]
        start = knock_s if abs(knock_s - s) < CATCH_S else s
        yield start, s + length, db


def nearest_knock(s):
    """The listed knock closest to a time."""
    return min(CLINKS, key=lambda clink: abs(clink[0] - s))


def contacts(rate, spread_db):
    """Tiny random touches, a few of them much harder than the rest."""
    sizes = undb(spread_db * np.minimum(rng.exponential(size=N), 4))
    return (rng.random(N) < rate / SR) * sizes * rng.choice([-1, 1], N)


def flicker(x):
    """Let each treble band waver in level on its own."""
    out = 0
    for k, band in enumerate(zip(FLICKER_EDGES_HZ, FLICKER_EDGES_HZ[1:])):
        band_filter = signal.butter(2, band, "bandpass", fs=SR, output="sos")
        waver = undb(FLICKER_DB * walk(FLICKER_PER_S))
        # alternate signs keep neighbours from cancelling where they overlap
        out = out + signal.sosfilt(band_filter, x) * (-1) ** k * waver
    return out


def shivers():
    """The small ring shivers in faint, separate pings, each on one of its modes and a little off pitch."""
    out = np.zeros((2, N))
    for _ in range(int(SHIVERS_PER_S * N / SR)):
        place, pick = rng.random(2)
        pitch, force = rng.standard_normal(2)
        hz, db, t60 = SMALL_RING_MODES[int(pick * len(SMALL_RING_MODES))]
        hz = hz * (1 + SHIVER_PITCH_SCATTER * pitch)
        ping = mode(hz, db + SHIVER_SPREAD_DB * min(force, 1.5), t60)
        add(out, place * N / SR, ping * seating())
    return out


def tinkles():
    """A small light ring is flicked or briefly rubbed: a bright tick and a short, very high ping."""
    out = np.zeros((2, N))
    for s, db, hz, t60, rub_s, tick_db in TINKLES:
        ping = through(contact(chatter=0.58, seconds=rub_s), mode(hz, 0, t60))
        tick = colour(contact(chatter=.5, seconds=.0007), TICK_COLOUR)
        ping = level(ping, db + .5, count=BLOW_SAMPLES)
        add(out, s, ping + level(tick, db + tick_db, count=BLOW_SAMPLES))
    return ports(out)


def squeaks():
    """Brief, slightly wavering whistles: sines with a rounded swell."""
    out = np.zeros((2, N))
    for s, length, hz, db in SQUEAKS:
        waver = uniform_filter1d(rng.standard_normal(RING_SAMPLES), size=150)
        swell = np.sin(np.pi * np.minimum(AGE / length, 1))
        turn = 2 * np.pi * np.cumsum(hz * (1 + 0.046 * waver)) / SR
        add(out, s, undb(db + 8.5) * swell * np.sin(turn))
    return out


def bumps():
    """The tugging leash makes the hand thud softly on the phone, with a short scuff of skin on the case."""
    out = np.zeros((2, N))
    soft_start = 1 - np.exp(-AGE / 0.0009)
    for s, db, hz, t60 in BUMPS:
        skin = stereo_noise(side_db=-8.5, count=RING_SAMPLES) * np.exp(-AGE / 0.0072)
        scuff = level(colour(skin, SCUFF_COLOUR), db - 20.0)
        thud = mode(hz, db - 0.5, t60, angle=0.38)
        add(out, s, (thud + scuff) * soft_start)
    return out


def wind():
    """Large eddies buffet the ports; small ones flutter almost separately on each. Gusts swell over the breeze."""
    (breeze_db,), (flutter_db,), (side_db,) = curves(BREEZE), curves(FLUTTER_LEVEL), curves(WIND_SIDE)
    flow = np.sqrt(undb(breeze_db) ** 2 + swells(GUSTS))
    eddies = undb(flutter_db) * (flow / undb(breeze_db)) ** FLUTTER_GROWTH
    buffet = colour(stereo_noise(side_db), BUFFET_COLOUR) * undb(walk(16))
    flutter = colour(stereo_noise(side_db=-1.0), FLUTTER_COLOUR) * undb(walk(60))
    air = level(buffet, -1.2) * flow + level(flutter, 0.075) * eddies
    return air * lean(WIND_LEAN_DB)


def swirls():
    """Short puffs of air slip round the phone and push its two ports mostly in opposite senses."""
    puff = colour(stereo_noise(side_db=17), SWIRL_COLOUR) * undb(3.6 * walk(70))
    return level(puff, 0) * np.sqrt(swells(SWIRLS))


def swishes():
    """Feet brush through the grass in soft, rounded strokes of noise."""
    noise = stereo_noise(side_db=-8.5) * undb(2 * walk(90))
    out = 0
    for s, width, db, hz in SWISHES:
        brush = colour(noise, [(hz / 3, -30), (hz, 0), (hz * 2, -14), (hz * 4, -35)])
        out = out + level(brush, 0) * np.sqrt(swells([(s, width, db)]))
    return out


def insect():
    """A narrow band of noise, quick and uneven in level, buzzes from the grass."""
    gate = 0
    for start, end, db in BUZZES:
        gate = gate + undb(db) * np.interp(TIME, [start, start + 0.0067, end - .02, end], [0, 1, 1, 0])
    outline = [(7500, -49), (8600, -13), (8850, -2), (9150, -2), (9500, -13), (10800, -54)]
    buzz = colour(stereo_noise(side_db=-1.0), outline)
    return level(buzz * undb(1.4 * walk(150)), 0) * gate


def field():
    """The hush of open ground and far trees: noise that swells only slightly."""
    hush = colour(stereo_noise(side_db=-4.0), FIELD_COLOUR)
    return level(hush * undb(HUSH_SWELL_DB * walk(HUSH_SWELL_PER_S)), -57.5)


def undb(db):
    """Decibels to gain."""
    return 10 ** (np.asarray(db) / 20)


def level(x, db, count=None):
    """Scale a sound so that its first count samples (or all) have this rms level."""
    return x * undb(db) / np.sqrt(np.mean(x[..., :count] ** 2) + 1e-18)


def lean(db):
    """Left and right gains that differ by db, left minus right."""
    return undb(np.array([[db], [-db]]) / 2)


def curves(table):
    """The columns of a table, joined by straight lines in time."""
    s, *columns = np.transpose(table)
    return [np.interp(TIME, s, c) for c in columns]


def swells(table):
    """The summed power of bell-shaped swells; power falls to 1/e at the half width."""
    t = TIME[::32]  # coarse control steps
    power = 0
    for s, width, db in table:
        power = power + undb(db) ** 2 * np.exp(-np.minimum(((t - s) / width) ** 2, 20))
    return np.interp(TIME, t, power)


def fade(gap, seconds):
    """Full strength where the gap is closed, dying away as it opens."""
    return np.exp(-np.clip(gap / seconds, 0, 20))


def walk(rate):
    """Slow chance with a spread near 1: random steps, smoothed twice."""
    k = int(SR / rate)
    steps = np.repeat(rng.standard_normal(N // k + 1), k)
    return 2.9 * uniform_filter1d(uniform_filter1d(steps, k), k)[:N]


def stereo_noise(side_db, count=N):
    """White noise with a given share that is opposite in the two ports."""
    mid, side = rng.standard_normal((2, count))
    return mid + undb(side_db) * np.array([side, -side])


def contact(chatter, seconds):
    """One sharp touch, then a brief chatter as the metal settles."""
    force = chatter * rng.standard_normal(RING_SAMPLES) * np.exp(-AGE / max(seconds, .0002))
    force[0] += 1
    return force


def mode(hz, db, t60, angle=0):
    """One fading resonance as the two ports hear it, left ahead of right by an angle [rad]."""
    turn = 2 * np.pi * hz * AGE + np.array([[angle], [-angle]]) / 2
    decay = np.exp(-np.log(1000) * AGE / max(t60, .001))
    return undb(db) * decay * np.sin(turn.astype(np.float32))


def through(x, response):
    """Drive a response with a force."""
    x = np.atleast_2d(x)
    return signal.oaconvolve(x, np.atleast_2d(response))[:, :x.shape[1]]


def colour(x, points):
    """Causal filter with a (frequency [Hz], level [dB]) outline, built from the cepstrum."""
    hz, db = np.transpose(points)
    size = 4096
    grid = np.fft.rfftfreq(size, 1 / SR) + 1
    cepstrum = irfft(np.log(undb(np.interp(np.log(grid), np.log(hz), db))))
    # fold the cepstrum forward for minimum phase
    cepstrum[1:size // 2] *= 2
    cepstrum[size // 2:] = 0
    return through(x, irfft(np.exp(rfft(cepstrum))))


def ports(x):
    """Turn the phase between left and right by frequency."""
    size = next_fast_len(N + RING_SAMPLES)
    angle = np.interp(np.fft.rfftfreq(size, 1 / SR), *np.transpose(PORT_PHASE))
    turn = np.exp(.5j * np.array([angle, -angle]))
    return irfft(rfft(x, size) * turn, size)[:, :N]


def add(out, s, sound):
    """Mix a short sound in at a time."""
    start = max(int(s * SR), 0)
    out[:, start:start + sound.shape[-1]] += sound[..., :max(N - start, 0)]


def scene():
    """Everything at the two ports."""
    metal = clinks() + rubbing() + tinkles() + squeaks()
    handling = bumps() + wind() + swirls()
    return metal + handling + swishes() + insect() + field()


def record(dry):
    """The phone cuts the top with a steep low-pass."""
    return signal.sosfilt(signal.ellip(8, .2, 70, TOP_HZ, fs=SR, output="sos"), dry)


dry = scene()
out = record(dry)
transcribe(out)
```